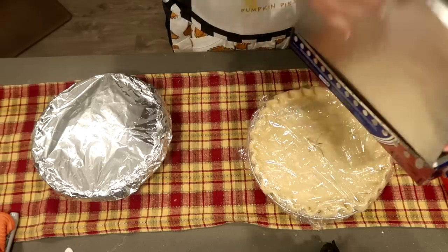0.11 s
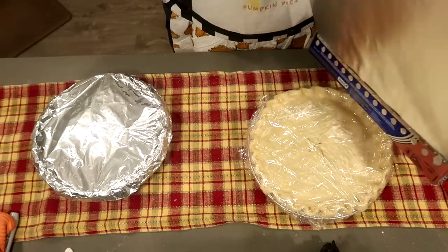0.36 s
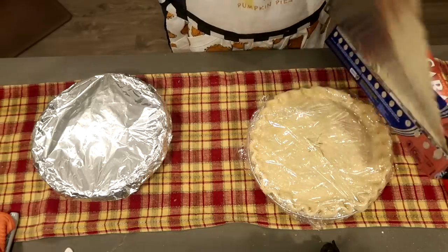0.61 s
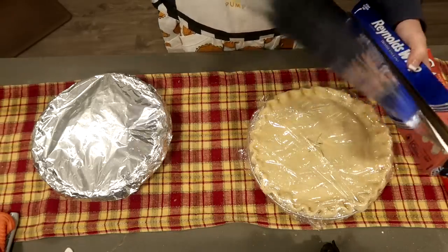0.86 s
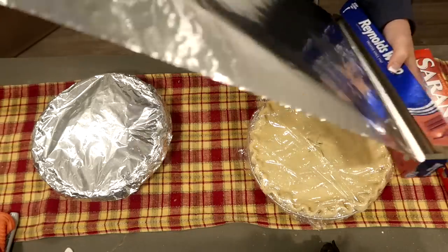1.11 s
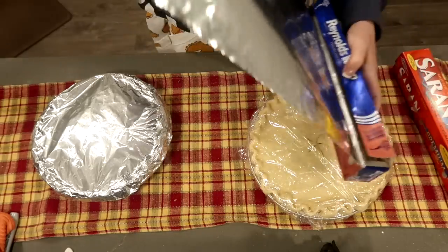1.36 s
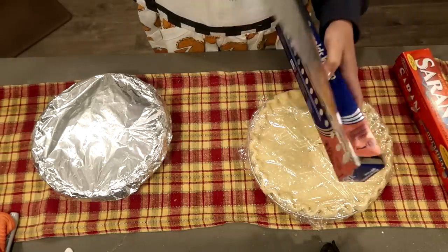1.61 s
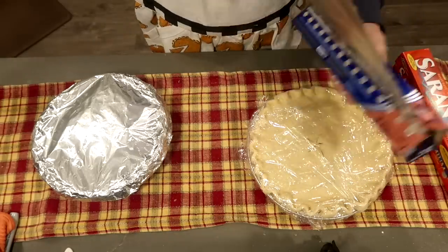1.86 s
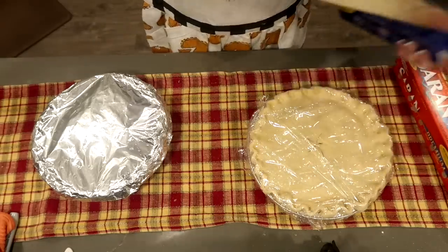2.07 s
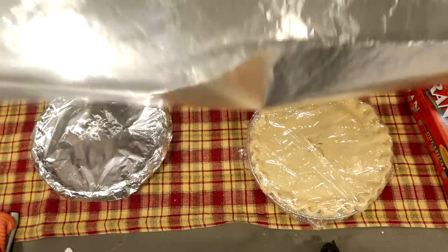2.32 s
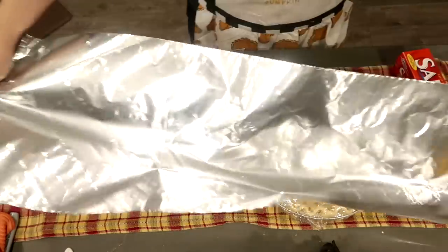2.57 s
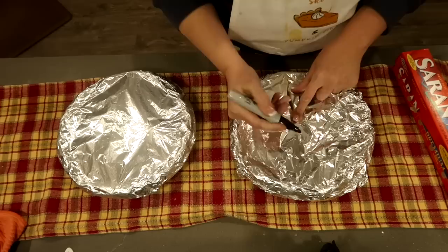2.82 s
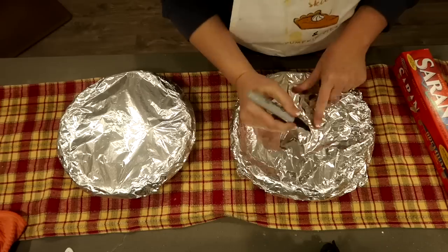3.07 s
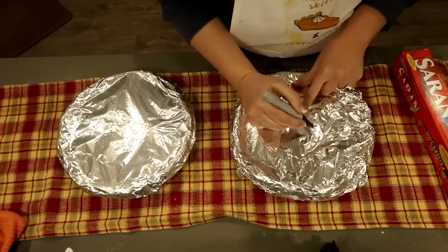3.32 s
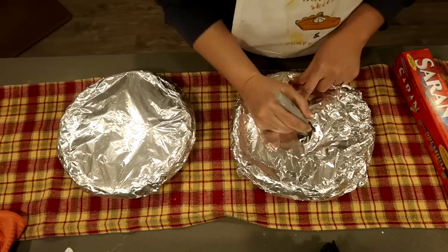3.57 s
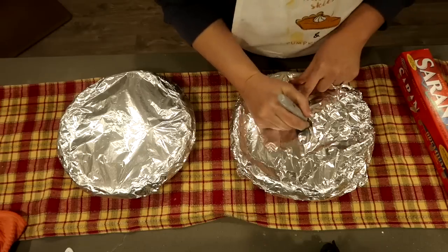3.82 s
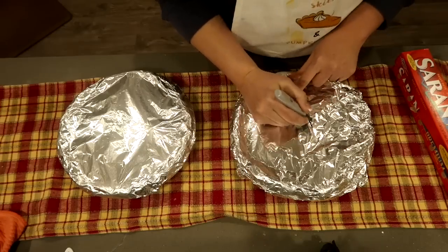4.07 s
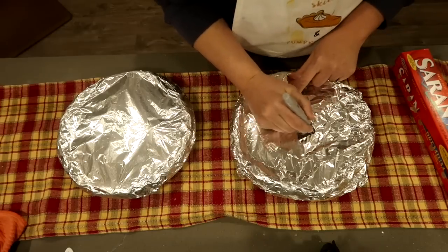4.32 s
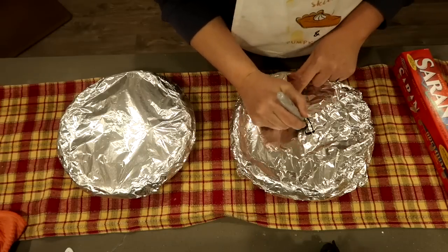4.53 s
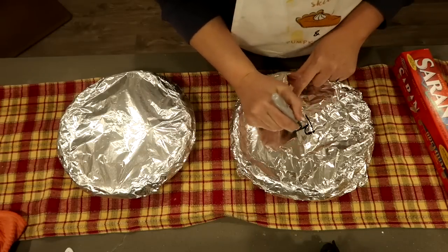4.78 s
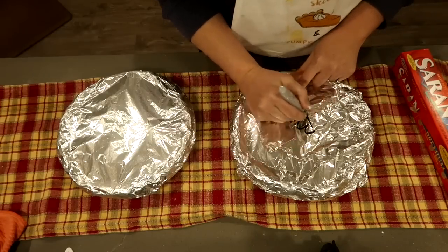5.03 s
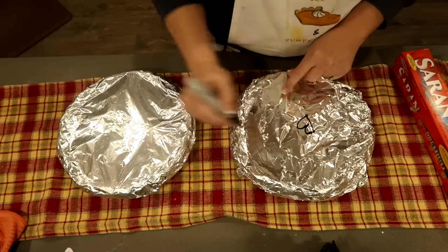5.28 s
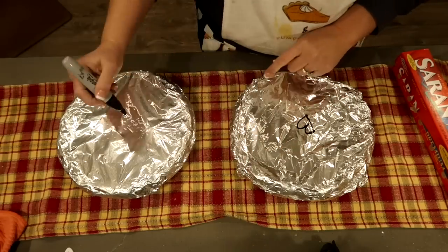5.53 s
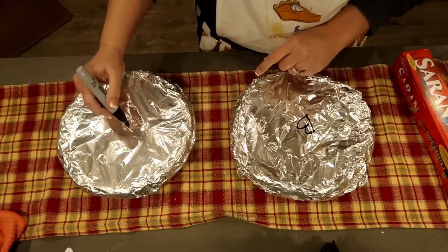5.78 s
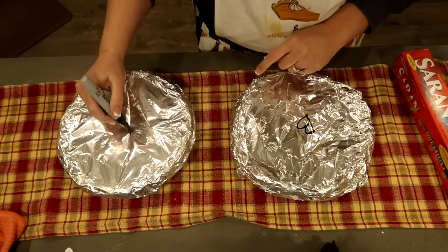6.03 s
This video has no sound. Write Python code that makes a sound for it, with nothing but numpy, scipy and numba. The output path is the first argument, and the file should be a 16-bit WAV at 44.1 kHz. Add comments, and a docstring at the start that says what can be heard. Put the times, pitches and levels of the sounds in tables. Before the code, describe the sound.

A big sheet of aluminum foil is pulled, torn and shaken with bright metallic crackle, then a marker squeaks out tiny ticks on crumpled foil.

```python
"""A long sheet of aluminium foil is pulled off its roll, torn and shaken out over a kitchen counter: thousands of
random short rings make the buckling, and longer sliding rings make the flexing metal. The roll rumbles (noise through
cardboard resonances) and knocks in its box. After a jump in time with a pop, a marker pen writes on crumpled foil:
creases snap as rings with partials over a faint crackle. The room is filtered noise with wavering hum."""
import sys
import numpy as np
from scipy import signal
from scipy.fft import rfft, irfft, next_fast_len
from scipy.io import wavfile
from scipy.ndimage import map_coordinates
from numba import njit

SR = 44100
rng = np.random.default_rng(int(sys.argv[2]) if len(sys.argv) > 2 else 0)


def dump_mix(stems):
    """Bounce the given channels to the path in sys.argv[1] as a 16-bit WAV at rate SR."""
    frames = np.atleast_2d(stems).T  # one column per channel
    limited = np.clip(frames, -1, 1)  # hard clip at full scale
    pcm = np.round(limited * 32767).astype(np.int16)
    wavfile.write(sys.argv[1], SR, pcm)


def magnitude_from_level(level_db):
    """Linear magnitude for a level in decibels (20 dB per decade)."""
    exponent = np.asarray(level_db, float) / 20
    return 10 ** exponent


N = 271115  # samples

# the pop at the jump in time: start_s, level_db
POP = (2.8134, -14)


def unit(x):
    """Energy normalisation: scales x to rms 1."""
    return x / np.sqrt(np.mean(x ** 2) + 1e-20)


def along(points, hz):
    """Logarithmic frequency scale: interpolates (Hz, value) points on it."""
    f, value = np.transpose(points)
    return np.interp(np.log(hz + 1), np.log(f + 1), value)


def wobble(rate, s):
    """Band-limited fluctuation: a smooth random curve of rate knots a second, read at times s."""
    knots = rng.standard_normal(int(N * rate / SR) + 4)
    return map_coordinates(knots, [s * rate])


def filtered(x, response):
    """Linear filtering: the spectrum of x times a complex response of frequency."""
    m = next_fast_len(N + SR // 2)
    return irfft(rfft(x, m) * response(np.fft.rfftfreq(m, 1 / SR)), m)[..., :N]


@njit
def add(out, start, step, cycles, size, glide):
    """Damped oscillation: a sine under u exp(1 - u), its pitch moved by the factor glide after `cycles` periods."""
    for k in range(len(start)):
        rise = cycles[k] / step[k] / 4  # samples to the peak
        for i in range(min(int(7 * rise), len(out) - start[k])):
            u = i / rise
            envelope = u * np.exp(1 - u)
            turns = step[k] * i * (1 + (glide[k] - 1) * u / 8)
            out[start[k] + i] += size[k] * envelope * np.sin(2 * np.pi * turns)


def rings(s, db, hz, cycles, glide=1):
    """Superposition: sums one damped oscillation for each start time, level and pitch."""
    out = np.zeros(N)
    start = (np.asarray(s) * SR).astype(np.int64)
    add(out, start, hz / SR, cycles + 0 * hz, magnitude_from_level(db), glide + 0. * hz)
    return out


def crackle(table, spectrum, rate, cycles, spread_db, clump_db, sheen_db):
    """Crackling noise: random buckles, rate a second, weak ones more numerous and high ones shorter."""
    t, level, *shape = np.transpose(table)
    duration = t[-1] - t[0]
    when, pitch, life, size = rng.random((int(rate * duration), 4)).T
    s = t[0] + when * duration
    hz = 250 + 15250 * pitch ** 2
    # 15 log10 makes up for high rings being shorter and rarer
    db = along(spectrum, hz) + 15 * np.log10(hz) + np.interp(s, t, level)
    db += -spread_db * np.log(1 - .98 * size)
    db += clump_db * (wobble(30, s) + wobble(120, s))
    # metallic colour: patches a third of an octave wide swell and fade 15 times a second
    patches = rng.standard_normal((int(15 * N / SR) + 4, 24))
    db += sheen_db * map_coordinates(patches, [15 * s, 3 * np.log2(hz / 200)])
    # further columns, if any: low body, then bright edge
    for column, edge in zip(shape, ([(1000, 0.98), (1800, 0.029)], [(3200, 0.035), (5200, 1)])):
        db += along(edge, hz) * np.interp(s, t, column - column.mean())
    power = np.mean(magnitude_from_level(np.interp(s, t, level)) ** 2) * duration * SR / N
    return np.sqrt(power) * unit(rings(s, db, hz, cycles * (.5 + life)))


def snaps(s, db, hz, crisp_db, parts_db):
    """Impulsive excitation: a main ring with a ladder of partials, then a rattle 2 to 14 ms later."""
    late, pitch, size = rng.random((len(s), 6, 3)).T
    step = np.arange(-1, 5)[:, None] / 4 + pitch / 8
    partial_db = db - 4 + crisp_db * step ** 2 - 4 * size
    ladder = (s + .001 * late, partial_db, np.minimum(hz * 3.3 ** step, 14000))
    rattle_db = db + parts_db - 8 * size - 9 * late
    rattle = (s + 0.00201 + .012 * late, rattle_db, hz * 0.61 * 4 ** pitch)
    out = rings(s, db - 2.5, hz, 3.2)
    for part in (ladder, rattle):
        out += rings(*(column.ravel() for column in part), 3.5)
    return out


def swells(t, start, hold, db, rise, fall):
    """Incoherent addition: dB level of overlapping swells that rise, hold and fall at slopes in dB a second."""
    t = t[:, None]
    each = db - rise * np.clip(start - t, 0, None) - fall * np.clip(t - start - hold, 0, None)
    return 10 * np.log10(np.sum(magnitude_from_level(each) ** 2, axis=1) + 1e-12)


def sheet():
    """Plate buckling: dense crackle of the loose foil, and sliding tones as the sheet flexes."""
    # the loose sheet: start_s, level_db, tautness (0-1), slack belly (0-1)
    motion = [(0.0, -23.5, 0.22, 0.94), (0.069, -31.5, 0.4, 0.76), (0.129, -28.8, 0.38, 0.63),
              (0.27, -19.0, 0.56, 0.7), (0.38, -17.5, 0.53, 0.26), (0.481, -20.5, 0.35, 0.57),
              (0.6, -20.5, 0.69, 0.57), (0.75, -23, 0.48, 0.58), (0.9, -30, 0.57, 0.3),
              (0.97, -28, 0.33, 0.53), (1.01, -24.5, 0.7, 0.3), (1.1, -21, 0.38, 0.12),
              (1.18, -16.5, 0.45, 0.3), (1.28, -24, 0.34, 0.44), (1.44, -26.5, 0.09, 0.49),
              (1.762, -20, 0.53, 0.5), (1.85, -24.5, 0.76, 0.53), (2.028, -19, 0.66, 0.2),
              (2.1, -20, 0.57, 0.77), (2.184, -15.5, 0.38, 0.5), (2.21, -20, 0.22, 0.78),
              (2.32, -24, 0.41, 1), (2.42, -33.5, 0.42, 0.62), (2.598, -37, 0.17, 0.58),
              (2.631, -24, 0.43, 0.64), (2.67, -32, 0.43, 0.63), (2.812, -30, 0.26, 0.47)]
    # colour of the buckles: pitch_hz, level_db (relative, per Hz)
    foil_colour = [(150, -43), (250, -16.5), (1030, -6), (1670, 1.5), (3060, .5), (5500, -6),
                   (10600, -18.5), (15500, -26)]
    # the sheet flexes and sings briefly: start_s, level_db, pitch_hz, slide (pitch factor)
    flexes = [(1.174, -15, 2570, 1.05), (1.19, -14, 3130, 1.0), (1.185, -14.5, 2100, 1.2),
              (1.242, -13, 2570, 1.04), (2.145, -11, 1810, 0.75), (2.159, -18, 928, 0.9),
              (2.167, -9.5, 1560, 1.34), (2.179, -7.5, 2610, 1.05), (2.188, -11, 2310, .97),
              (2.191, -8, 1800, .74), (2.214, -17.5, 1044, 1.1), (2.232, -13.5, 1030, 1.0),
              (2.254, -20.5, 422, 1.8), (2.269, -14, 1510, .95), (2.286, -17, 1860, .8),
              (2.312, -14, 1040, 1.1)]
    slack_body_db, taut_edge_db = 18, 22.5  # a slack sheet gains low body, a taut one a bright edge
    foil_low_hz = 160  # the crackle fades out below this
    t, level, taut, slack = np.transpose(motion)
    table = np.transpose([t, level, slack_body_db * slack, taut_edge_db * taut])
    dense = crackle(table, foil_colour, rate=19000, cycles=6, spread_db=3.2, clump_db=.6, sheen_db=1.4)
    radiated = filtered(dense, lambda f: f ** 2 / (f ** 2 + foil_low_hz ** 2))
    s, db, hz, glide = np.transpose(flexes)
    return magnitude_from_level(0.27) * radiated + rings(s, db, hz, 15.2, glide)


def box():
    """Friction and impact on a resonator: lumpy drag through cardboard modes, knocks with a hollow thud."""
    # resonances of the cardboard: pitch_hz, width_hz, level_db (relative)
    modes = [(57, 14.4, -0.5), (117, 65, -2.5), (195, 120, -1.5), (437, 250, -4)]
    # roll on box: start_s, level_db
    knock_table = [(0.108, -14), (0.144, -7.5), (0.211, -16), (0.249, -6), (0.277, -6.5), (0.317, -10.5)]
    # the roll lurches in the box: start_s, level_db
    bumps = [(0.148, -31), (0.261, -24.5), (0.332, -28.5), (0.4, -32.5), (0.56, -34.5), (0.629, -30),
             (0.79, -39), (2.151, -32)]
    bump_rise_db_per_s, bump_fall_db_per_s = 193, 252
    drag_db, laid_down_s, rest_db = -48.5, 2.2, -72  # steady drag while the box is held, and what is left after
    t = np.arange(N) / SR

    def cardboard(f):
        """Modal sum: resonances of alternating sign, with less deep bass."""
        total = sum((-1) ** k * magnitude_from_level(db) * 1j * f * w / (c * c - f * f + 1j * f * w)
                    for k, (c, w, db) in enumerate(modes))
        return total * f ** 2 / (f ** 2 + 70 ** 2)

    lumpy = magnitude_from_level(2.2 * wobble(22, t)) * rng.standard_normal(N)
    drag = unit(filtered(lumpy, cardboard))
    s, db = np.transpose(knock_table)
    knocks = snaps(s, db, 0 * s + 1300, crisp_db=-46, parts_db=-5.0)
    knocks += rings(s + 0.00492, db - 15.5, 0 * s + 450, 3.8)  # hollow thud
    at, peak = np.transpose(bumps)
    lurch = magnitude_from_level(swells(t, at, 0, peak, bump_rise_db_per_s, bump_fall_db_per_s))
    held = magnitude_from_level(swells(t, 0, laid_down_s, np.array([drag_db]), 0, bump_fall_db_per_s))
    drag_level = np.hypot(np.hypot(lurch, held), magnitude_from_level(rest_db))
    thumps = rings(at - .01, peak + 0.79, 0 * at + 118, 2.6)
    return drag_level * drag + knocks + thumps


def kitchen():
    """Diffuse field: noise with a set left-right coherence, plus wavering hum; fainter before the jump."""
    # colour of the room noise: pitch_hz, level_db (relative, per Hz)
    room_colour = [(12, -40), (20, -4.5), (80, -6.5), (259, -2.5), (597, -8.5), (1820, -14), (4310, -18.5),
                   (12400, -33), (15200, -45)]
    # left-right likeness of the room noise: pitch_hz, coherence (-1 to 1)
    likeness = [(120, 0.87), (500, -0.14), (2380, -0.13)]
    # appliances: pitch_hz, level_db (nominal)
    hum_tones = [(59, -64), (91, -63.5)]

    def mid_side(hz):
        """Coherence as an angle: shares the power between mid and side."""
        angle = np.arccos(np.clip(along(likeness, hz), -1, 1)) / 2
        return magnitude_from_level(along(room_colour, hz)) * [np.cos(angle), np.sin(angle)]

    mid, side = filtered(rng.standard_normal((2, N)), mid_side)
    noise = magnitude_from_level(-52) * unit(np.array([mid + side, mid - side]))
    t = np.arange(N) / SR
    hum = sum(magnitude_from_level(db + 1.0 + 1.5 * wobble(5.4, t)) * np.sin(2 * np.pi * hz * t) for hz, db in hum_tones)
    return (noise + hum) * np.where(t < POP[0], magnitude_from_level(-16.0), 1)


def pop():
    """Pressure doublet: a push and, 1 ms later, a pull."""
    s, db = POP
    t = np.arange(N) / SR
    pulse = lambda at: np.exp(-((t - at) / .00015) ** 2)
    return magnitude_from_level(db) * (pulse(s - .0013) - pulse(s - .0003))


def marker():
    """Stick and release: the tip's strokes give faint crackle, small random snaps and larger single ones."""
    # strokes of tip and fingers over the crumpled foil: start_s, hold_s, level_db
    strokes = [(2.838, 0.017, -33.5), (2.945, 0.027, -41), (3.037, 0.023, -41.5), (3.113, 0.094, -49.5),
               (3.304, 0.07, -51), (3.378, 0.0079, -41), (3.45, 0.021, -47), (3.773, 0.0095, -41.5),
               (3.95, 0.079, -47), (4.37, .11, -47.5), (4.541, 0.072, -50.5), (4.817, 0.056, -46.5),
               (4.94, 0.013, -42), (5.024, 0.072, -47), (5.258, 0.029, -48), (5.587, 0.27, -60),
               (6.057, 0.047, -30.5)]
    # colour of the creased foil: pitch_hz, level_db (relative, per Hz)
    creased_colour = [(350, -8.5), (900, -7), (1600, 6), (3300, 4.5), (5500, -4.5), (10000, -14)]
    # larger creases: start_s, level_db, pitch_hz
    creases = [(2.9008, -25.5, 3160), (2.9411, -19.5, 3320), (3.031, -31, 2370), (3.3821, -28, 2180),
               (3.39, -23, 3120), (3.4442, -19, 2210), (3.469, -27, 2080), (3.485, -36, 1600),
               (3.5826, -21, 2110), (3.6287, -35.5, 3800), (3.755, -31, 2150), (3.767, -40, 4500),
               (3.8315, -24, 2040), (3.8621, -33, 1890), (3.8931, -34, 1550), (3.9405, -26, 2130),
               (3.9833, -32, 2040), (3.9975, -27, 3000), (4.0316, -26.5, 3440), (4.1634, -36, 3300),
               (4.3043, -28, 3300), (4.385, -30, 1700), (4.448, -32.5, 1920), (4.524, -35, 2180),
               (4.5483, -24, 2370), (4.6099, -44, 2190), (4.8394, -34, 2610), (4.9426, -20, 3280),
               (5.0375, -28, 3260), (5.105, -29, 2840), (5.202, -38, 2080), (5.3184, -29.5, 2330),
               (6.052, -25, 2780), (6.09, -21.5, 2550)]
    stroke_rise_db_per_s, stroke_fall_db_per_s = 914, 190
    t = np.arange(POP[0], N / SR, .002)
    level = swells(t, *np.transpose(strokes), stroke_rise_db_per_s, stroke_fall_db_per_s)
    fine = crackle(np.transpose([t, level]), creased_colour, rate=9000, cycles=5,
                   spread_db=3.1, clump_db=2.1, sheen_db=2)
    duration = t[-1] - t[0]
    when, size, pitch = rng.random((int(45 * duration), 3)).T  # 45 small snaps a second
    s = t[0] + when * duration
    small = [s, np.interp(s, t, level) + 12 * size, 1600 * 2.4 ** pitch]
    every_snap = np.hstack([np.transpose(creases), small])
    return magnitude_from_level(-1.5) * fine + snaps(*every_snap, crisp_db=-20, parts_db=-5.0)


def taps():
    """Heavily damped impact: the tip lands with a short dull thud under the foil."""
    # landings of the tip: start_s, level_db
    landings = [(4.3847, -36), (4.944, -30.5)]
    s, db = np.transpose(landings)
    return rings(s, db, 0 * s + 516, 0.74)  # Hz, cycles


def tail(t60, seconds):
    """Reverberant decay: noise of energy 1 in which each frequency dies at its own speed."""
    hz, t, z = signal.stft(rng.standard_normal(int(seconds * SR)), SR, nperseg=128)
    h = signal.istft(z * magnitude_from_level(-60 * t / t60(hz)[:, None]), SR, nperseg=128)[1]
    return h / np.linalg.norm(h)


def heard_from(x, wet_db):
    """Direct and reverberant field of one spot: side is the sound smeared by a few ms; the room answers both."""
    # counter and walls: pitch_hz, t60_s
    decay = [(300, 0.43), (2000, 0.25)]
    late = np.pad(x, (200, 0))[:N]
    mid, side = (magnitude_from_level(wet_db) * signal.fftconvolve(late, tail(lambda hz: along(decay, hz), 0.36))[:N]
                 for _ in range(2))
    smeared = signal.fftconvolve(x, tail(lambda hz: 0 * hz + .012, .03))[:N]
    return np.array([x + mid, side + smeared])


def space(x, wet_db, lean, count=5):
    """Spatial decorrelation: crossfades through count spots in turn, ten a second, with wide treble."""
    # stereo width: pitch_hz, level_db (gain on the side)
    width = [(100, -21), (700, -19.5), (3000, -10.5), (6500, 3.5), (12000, 6)]
    turn = np.arange(N) * 10 / SR
    share = lambda k: np.clip(1 - abs((turn - k) % count - 1), 0, 1)
    mid, side = sum(heard_from(x * share(k), wet_db) for k in range(count))
    side = filtered(side, lambda hz: magnitude_from_level(along(width, hz))) + lean * mid  # lean shifts the image sideways
    return np.array([mid + side, mid - side])


def scene():
    """Superposition of two moments joined by a pop, over the room noise."""
    t = np.arange(N) / SR
    before = space(sheet() + box(), wet_db=-6, lean=.02) * (t < POP[0])
    after = space(marker() + taps(), wet_db=-10, lean=-.05)
    return before + pop() + after + kitchen()


def top_cut(x):
    """Nothing passes above the cut-off."""
    return signal.sosfilt(signal.butter(12, 16460, fs=SR, output="sos"), x)


def record(dry):
    """Band limitation: nothing at or above 15.8 kHz enters the finished mix."""
    mix = filtered(dry, lambda hz: hz < 15800)
    return top_cut(mix)


dry = scene()
out = record(dry)
dump_mix(out)
```